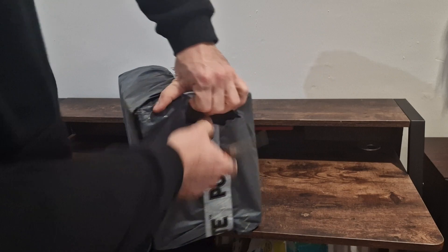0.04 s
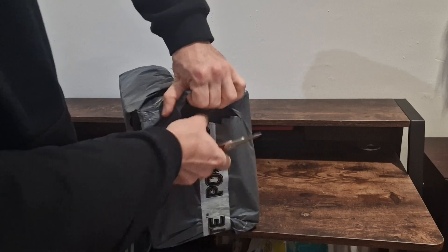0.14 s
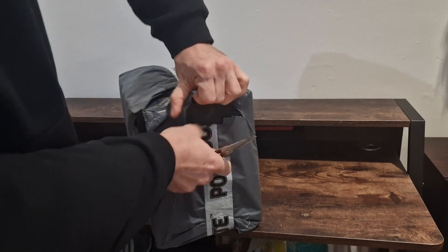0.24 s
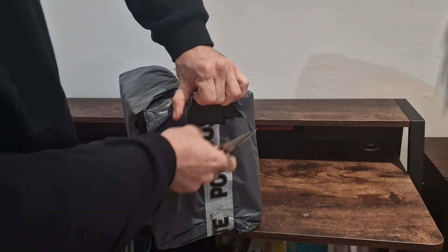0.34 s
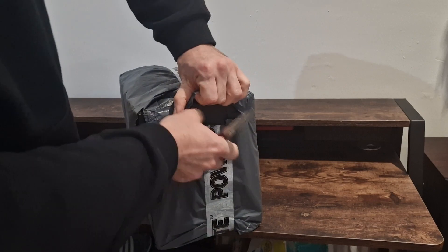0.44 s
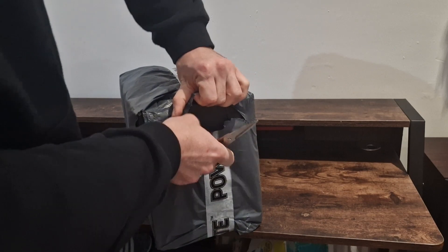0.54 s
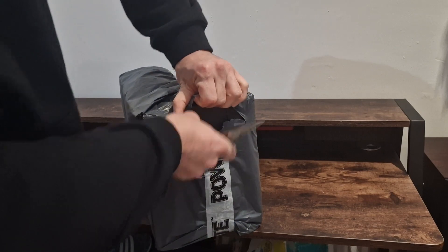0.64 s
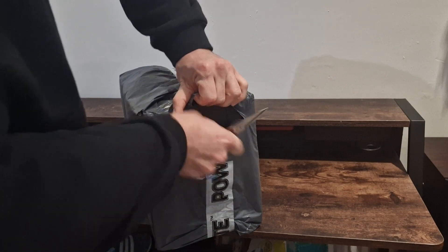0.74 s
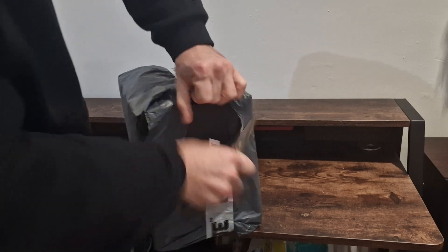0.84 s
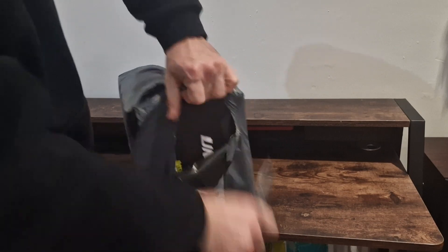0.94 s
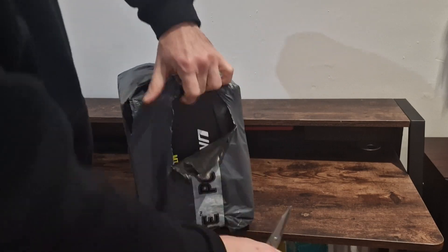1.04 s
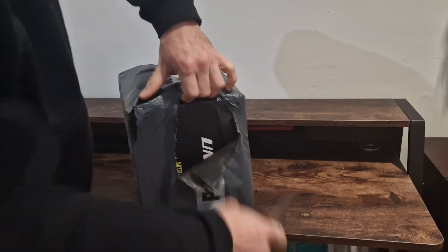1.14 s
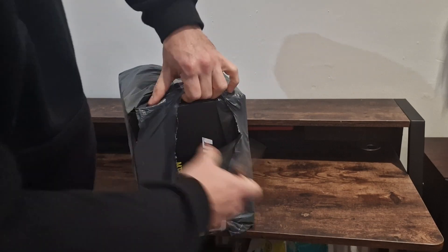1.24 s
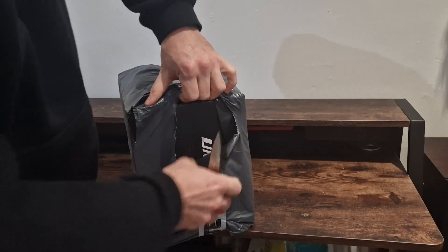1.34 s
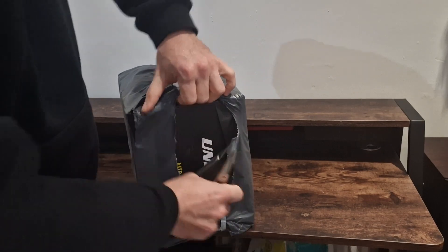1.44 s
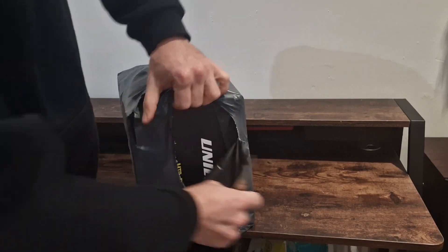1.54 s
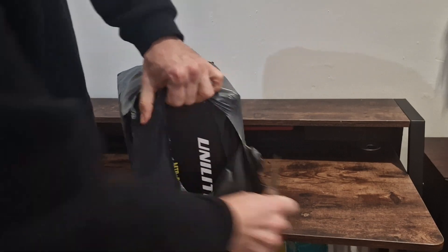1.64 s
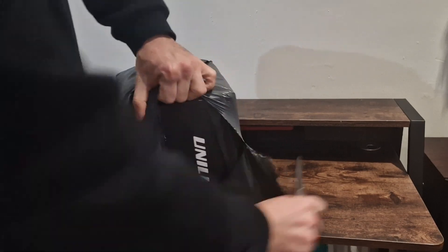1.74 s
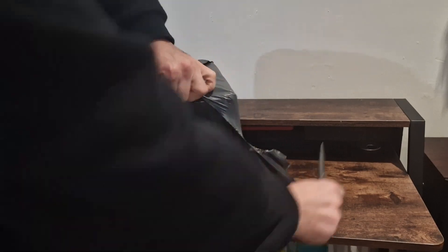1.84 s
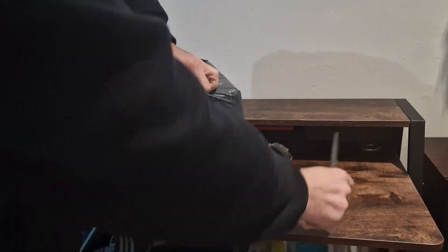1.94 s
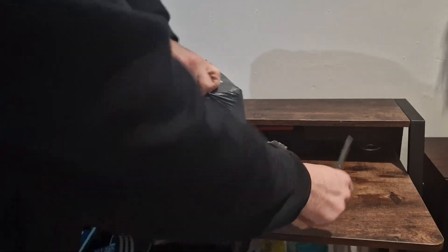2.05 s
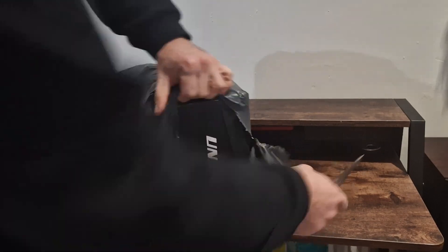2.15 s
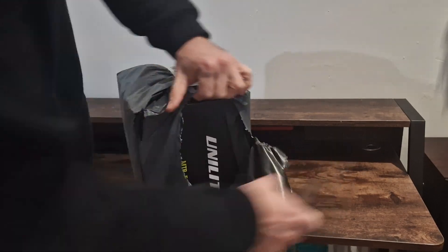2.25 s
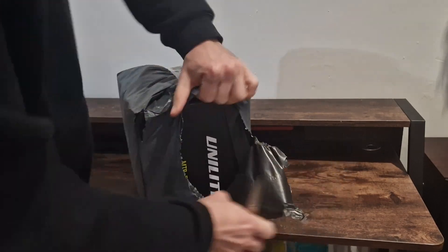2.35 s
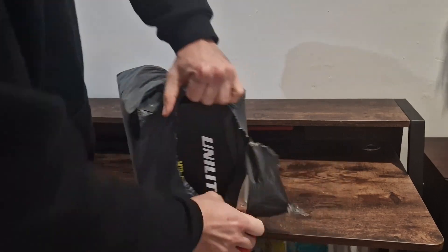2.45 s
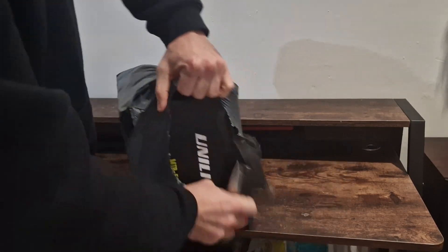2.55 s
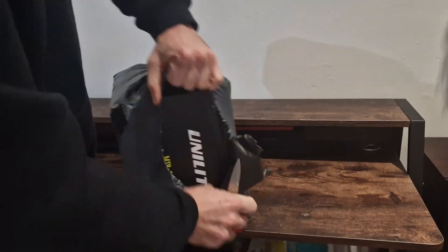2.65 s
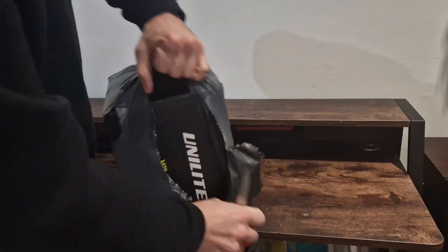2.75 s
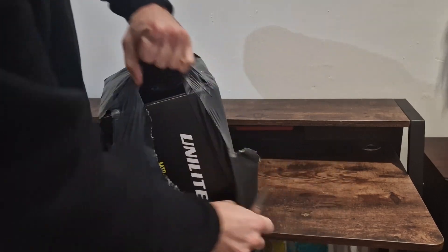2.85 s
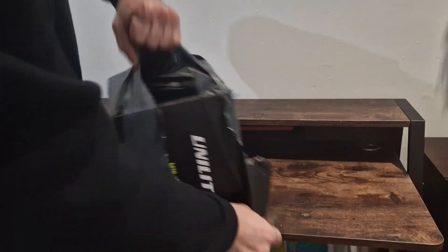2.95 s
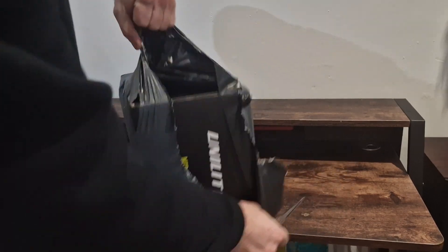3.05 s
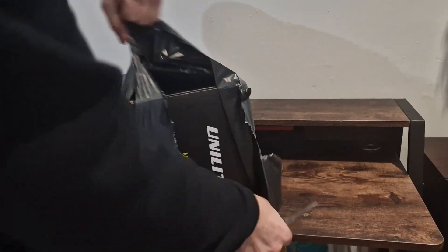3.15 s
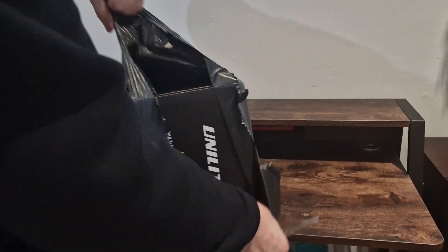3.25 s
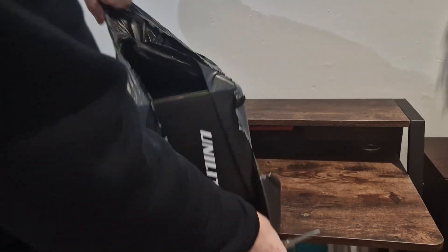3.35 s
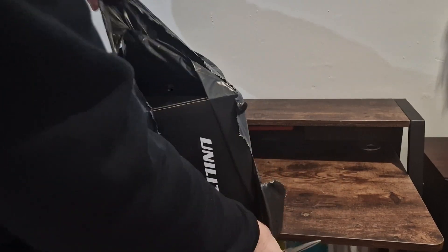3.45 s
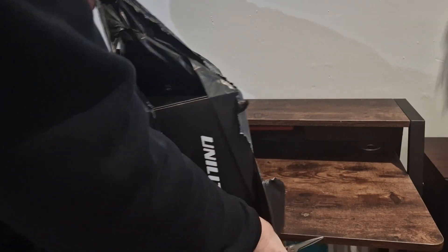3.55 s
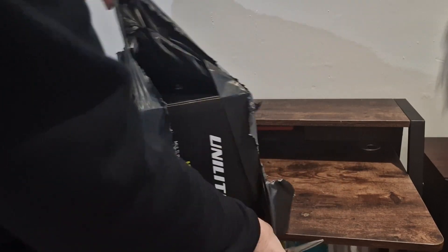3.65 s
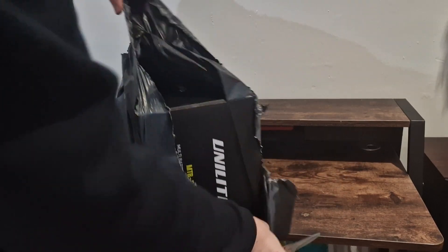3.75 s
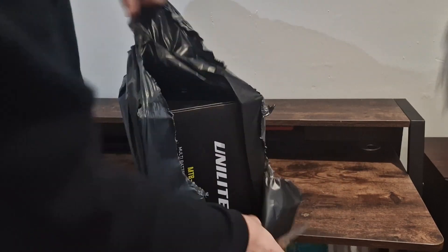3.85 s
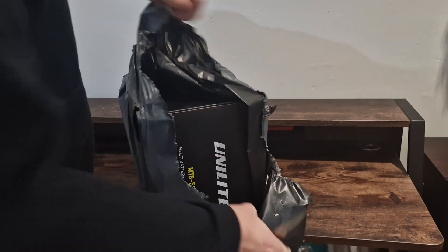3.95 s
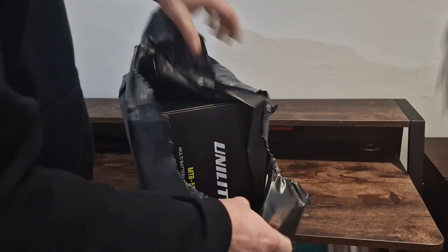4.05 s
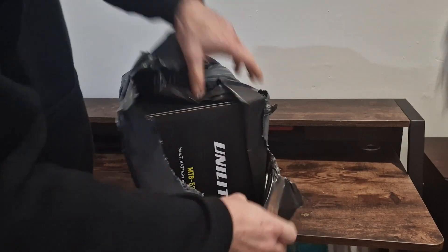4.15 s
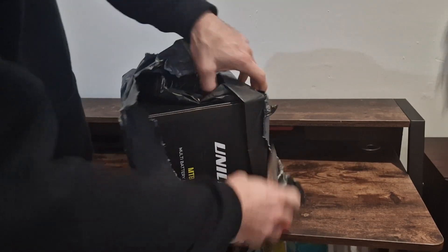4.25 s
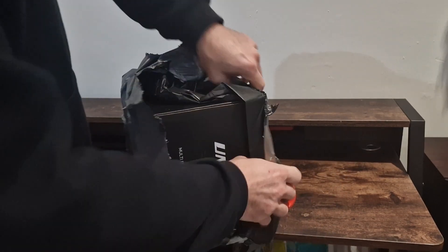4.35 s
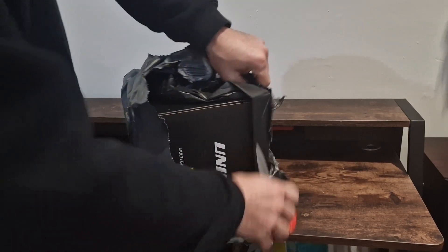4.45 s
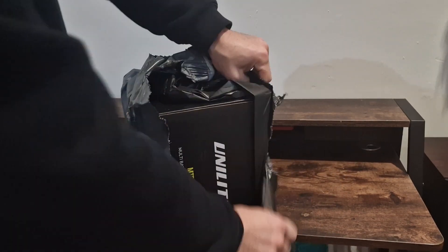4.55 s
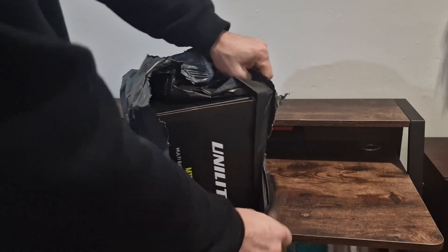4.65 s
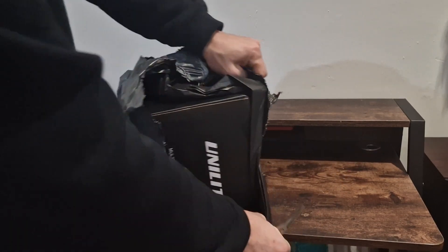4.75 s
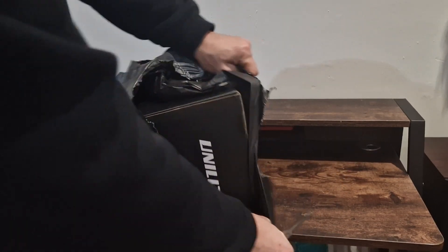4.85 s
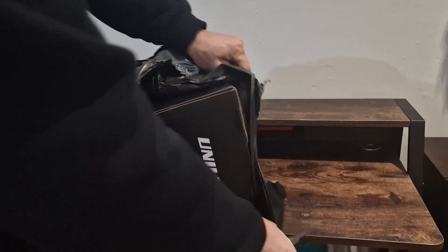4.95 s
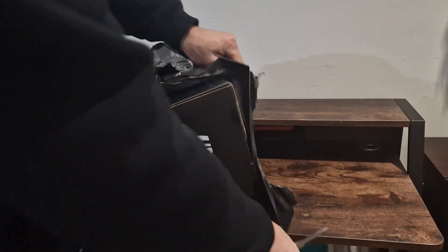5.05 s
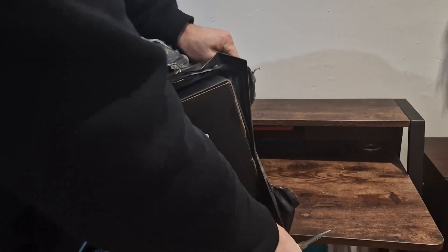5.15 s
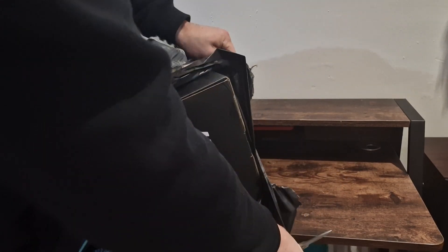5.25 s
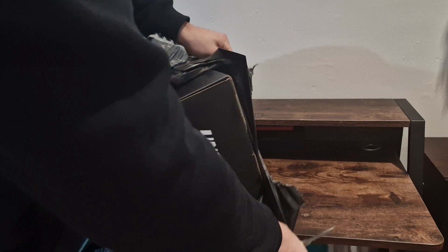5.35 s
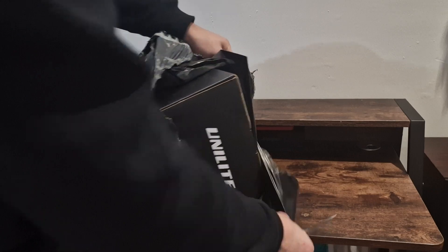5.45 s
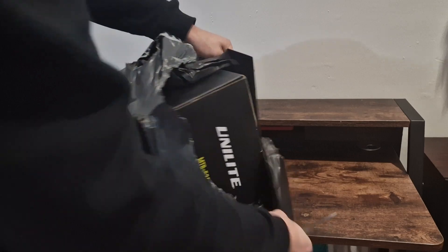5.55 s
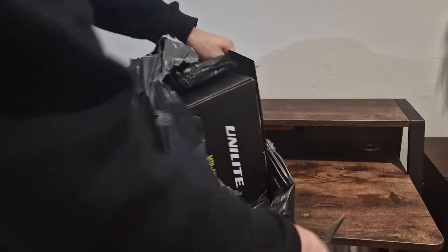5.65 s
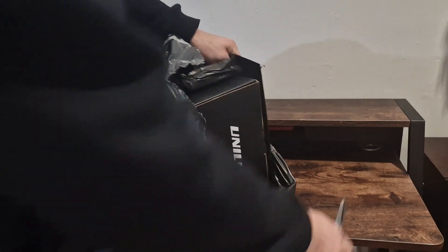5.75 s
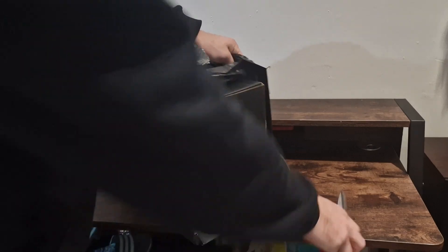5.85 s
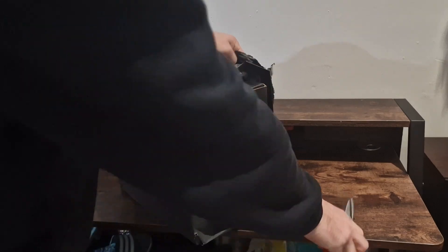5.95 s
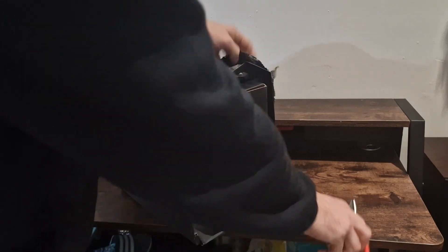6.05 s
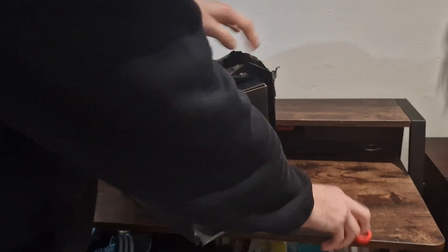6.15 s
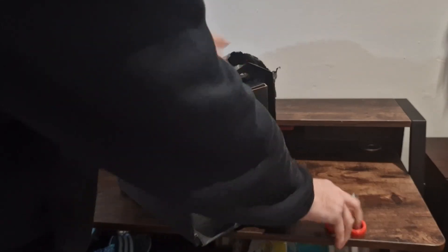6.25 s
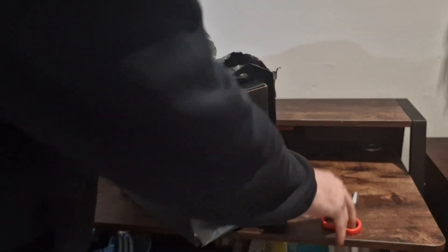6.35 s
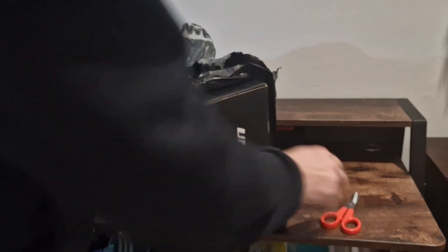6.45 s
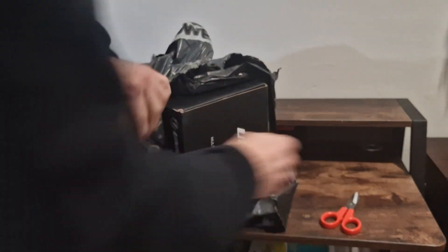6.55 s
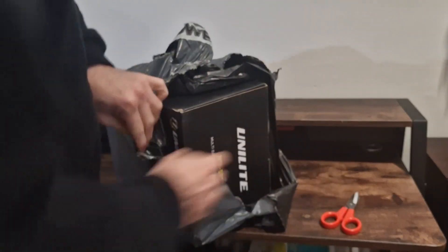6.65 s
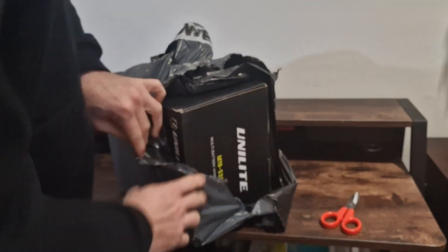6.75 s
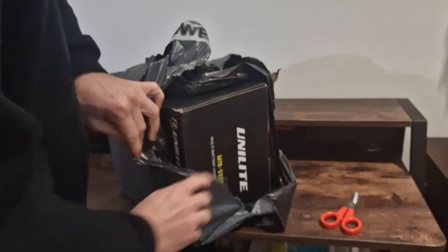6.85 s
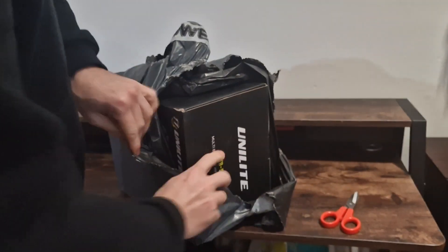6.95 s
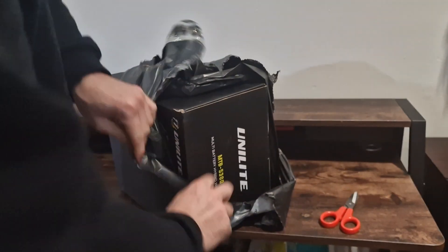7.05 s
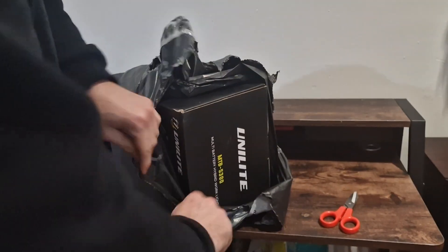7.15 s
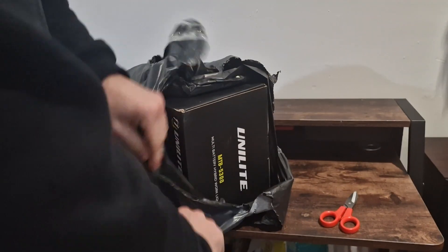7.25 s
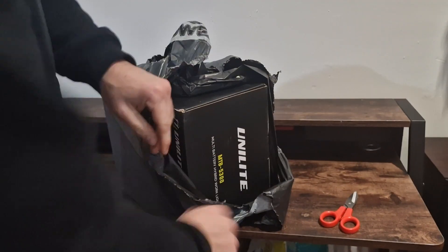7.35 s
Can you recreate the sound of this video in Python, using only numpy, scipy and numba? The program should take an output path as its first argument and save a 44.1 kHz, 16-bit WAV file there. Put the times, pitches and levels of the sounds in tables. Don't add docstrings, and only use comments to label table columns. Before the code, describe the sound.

A thin plastic bag is torn and stripped from a cardboard box in a small room. Light crinkles lead to sharp rips, then fuller waves of crackling with hollow knocks and low rumbles. The box briefly squeaks and scrapes on the desk. Near the end scissors thud softly, drop with a metallic rattle, and quieter rustling follows. Close stereo pickup with little bass and soft room noise.

```python
import sys
import numpy as np
from scipy import signal
from scipy.fft import rfft, irfft, next_fast_len
from scipy.io import wavfile
from scipy.ndimage import uniform_filter1d, map_coordinates
from numba import njit

SR = 44100
rng = np.random.default_rng(int(sys.argv[2]) if len(sys.argv) > 2 else 0)


def wav_record(signal):
    frames = np.transpose(np.atleast_2d(signal))
    bounded = np.clip(frames, -1, 1)
    quanta = np.round(bounded * 32767).astype(np.int16)
    wavfile.write(sys.argv[1], SR, quanta)


def linear_from_db(decibels):
    return 10 ** (np.asarray(decibels, float) / 20)


N = 325899

# frequency in Hz, gain in dB.
THIN_THINGS = [(80, -60), (350, 0)]


def unit(x):
    return x / np.sqrt(np.mean(x ** 2) + 1e-20)


def along(points, hz):
    f, v = np.transpose(points)
    return np.interp(np.log(hz + 1), np.log(f + 1), v)


def curves(rows):
    s, *cols = np.transpose(rows)
    return [np.interp(np.arange(N) / SR, s, c) for c in cols]


def wobble(rate):
    knots = rng.standard_normal(int(N * rate / SR) + 4)
    return map_coordinates(knots, [np.arange(N) * rate / SR])


def coloured(x, spectrum):
    m = next_fast_len(N + 8192)
    gain = linear_from_db(along(spectrum, np.fft.rfftfreq(m, 1 / SR)))
    return irfft(rfft(x, m) * gain, m)[..., :N]


def cut(x, hz, kind, order):
    return signal.sosfilt(signal.butter(N=order, Wn=hz, btype=kind, fs=SR, output="sos"), x)


def thirds(body, middle, fizz):
    edges_hz = (1500, 8700)
    return cut(body, edges_hz[0], "low", 3), cut(middle, edges_hz, "band", 3), cut(fizz, edges_hz[1], "high", 3)


def add(track, s, sound):
    at = int(round(s * SR))
    track[..., at:at + sound.shape[-1]] += sound[..., :track.shape[-1] - at]


def ring(modes, t, attack):
    tone = 0
    for hz, db, t60 in modes:
        for spread, weaker_db in ((.005, 1), (.04, 6)):
            pitch = hz * rng.normal(1, spread)
            level_db = db - weaker_db + rng.normal(0, 3.7)
            tone = tone + linear_from_db(level_db - 60 * t / t60) * np.sin(2 * np.pi * pitch * t)
    return tone * (1 - np.exp(-t / attack))


def ports(x, lag):
    m = next_fast_len(N + 64)
    turn = np.exp(-1j * np.pi * np.fft.rfftfreq(m) * lag * np.array([[1], [-1]]))
    return irfft(rfft(x, m) * turn, m)[:, :N]


def played(rows):
    s = np.arange(N) / SR
    return (s > rows[0][0]) * (s < rows[-1][0]) * linear_from_db(curves(rows)[0])


def effort(layer):
    # time of most force in
    # seconds, crinkle level in dB, swell in seconds, fade in seconds, grip in dB (how much of the box it
    pulls = [(0.06, -54.5, 0.12, 0.13, -11), (.14, -53, 0.12, 0.061, 3), (.218, -53, 0.055, .05, -23),
             (0.279, -48.5, 0.056, 0.095, 6), (0.375, -56.5, .04, 0.08, -22),
             (.425, -57.5, 0.075, 0.042, -37), (0.539, -55, 0.095, 0.13, -3),
             (.615, -56.5, 0.027, 0.17, -5), (0.765, -50, 0.034, 0.065, -31),
             (.815, -46.5, 0.05, .06, -18), (0.902, -37.5, 0.11, 0.12, -10.5),
             (1.126, -53, 0.12, 0.22, -5.5), (1.353, -53.5, 0.0095, 0.89, -18),
             (1.492, -53, 0.11, 0.12, -13), (1.6, -59, .04, .1, -14), (1.686, -44, 0.23, 0.24, -13),
             (1.785, -39.5, 0.018, 0.043, -14), (1.976, -59.5, 0.47, 0.064, -15),
             (2.2, -54.5, 0.24, 0.24, -16), (2.354, -56.5, 0.049, 0.27, -11),
             (2.5, -40.5, 0.086, 0.13, -13), (2.58, -46, 0.045, 0.084, -13),
             (2.678, -43.5, 0.087, 0.12, -15), (2.75, -45, 0.094, 0.23, -8.5),
             (2.857, -45, 0.14, 0.14, -15), (2.96, -41, 0.063, 0.08, -9), (3.02, -43.5, 0.068, 0.12, 0),
             (3.237, -41.5, 0.17, 0.2, -7.5), (3.32, -41.5, 0.058, 0.095, -9),
             (3.41, -37, 0.088, .11, -14), (3.49, -47, 0.13, 0.087, -13),
             (3.67, -61.5, 0.13, 0.12, 14), (3.8, -49, 0.26, 0.51, -11), (3.903, -52, 0.024, 0.1, -13),
                 (4.188, -48, 0.14, 0.12, -6), (4.282, -48, 0.078, 1, -17.5),
                 (4.564, -47.5, 0.075, 0.13, 4), (4.947, -43.5, 0.54, 0.35, -18),
                 (5.1, -45, 0.14, 0.069, -11), (5.262, -49.5, 0.42, 0.54, -10),
                 (5.55, -42.5, 0.26, 0.31, -23), (5.592, -40, 0.011, 0.061, 6),
                 (5.853, -52.5, 0.052, 0.41, -7), (6.045, -50, 0.065, 0.048, -22),
                 (6.503, -57, 0.79, 0.44, -10), (6.742, -51, 0.15, 0.19, -15),
                 (6.913, -50.5, 0.061, 0.17, -6.5), (7.129, -44.5, 0.15, 0.16, -21.5),
                 (7.245, -51, 0.031, 0.076, -19.5)]
    layers = {"body": (-0.89, 0.33, 1), "middle": (2.78, 0.0078, 1.22), "fizz": (-3, 0.028, 1.34),
              "rumble": (-5, 0.38, 0.82)}
    stroke_db, roundness = 20, 1.5
    over_db, share, steep = layers[layer]
    t = np.arange(0, N, 64) / SR
    s, db, swell, fade, grip_db = np.transpose(pulls)[:, :, None]
    away = np.where(t < s, (s - t) / np.maximum(swell, .01), (t - s) / np.maximum(fade, .01))
    level_db = db + over_db + share * grip_db - steep * stroke_db * away ** roundness
    power = linear_from_db(2 * level_db).sum(axis=0)
    return np.interp(np.arange(N) / SR, t, np.sqrt(power))


@njit
def sprinkle(n, start, lag, step, fade, size):
    out = np.zeros((2, n + 512))
    for g in range(len(start)):
        for i in range(min(400, int(6 / fade[g]))):
            v = size[g] * np.exp(-fade[g] * i) * np.sin(step[g] * (i + 1))
            out[0, start[g] + lag[g] + i] += v
            out[1, start[g] + i] += v
    return out[:, :n]


def crinkle(count, spread_db, cycles, lag, lag_spread):
    draw = rng.random((count, 4))
    busy = np.cumsum(linear_from_db(3 * wobble(20) + 2.5 * wobble(90)))
    start = np.searchsorted(busy, draw[:, 0] * busy[-1]) + 16
    step = 2 * np.pi * 400 * 40 ** draw[:, 1] ** .7 / SR
    size_db = np.minimum(-spread_db * np.log(1 - draw[:, 2]), 17)
    gap = np.round(lag + lag_spread * (2 * draw[:, 3] - 1))
    gap = np.clip(gap, -16, 16).astype(np.int64)
    return sprinkle(N, start, gap, step, step / (np.pi * cycles), linear_from_db(size_db) * step)


def bag():
    # frequency in Hz, level in dB per Hz.
    film = [(180, -38), (300, -5.5), (406, 0), (531, -2), (754, -1.5), (892, -3.5), (1310, -3), (1720, -3),
            (2700, 0), (7500, -6.5), (9810, -19.5), (15200, -20), (16500, -19)]
    # time in seconds, level in dB, tightness from 0 to 1 (how high it sounds).
    pouch = [(0.3, -16, 0), (0.7, -16.5, 0.3), (0.9, -18, .4), (1.7, -14, 0.3), (2.05, -8, 0.7),
             (2.25, -18.5, 0.6), (2.62, -9, 0.4), (2.9, -14.5, 0.2), (3.1, -16, .6), (3.6, -9, 0.1),
             (4.2, -18.5, 0.5), (4.5, -12.5, 0.5), (4.9, -10.5, 0), (5.27, -9.5, 0.03), (5.85, -9, 0.1),
             (6.3, -8, 0.7), (6.7, -19, 0.3), (7.2, -23.5, 0.1)]
    slack_hz, tight_hz = (1100, 2150), (1800, 2450)
    dulling = 0.6
    clicks = unit(crinkle(count=70000, spread_db=4.3, cycles=2.5, lag=-3, lag_spread=8))
    rub = unit(rng.standard_normal((2, N)) + 0.5 * rng.standard_normal(N))
    rustle = coloured(clicks + 0.78 * rub, THIN_THINGS[:1] + film)
    body, middle, fizz = thirds(rustle, rustle, rustle)
    pouch_db, tight = curves(pouch)
    low = unit(cut(middle, slack_hz, "band", 2))
    high = unit(cut(middle, tight_hz, "band", 2))
    hollow = np.sqrt(np.clip(1 - tight, 0, 1)) * low + np.sqrt(np.clip(tight, 0, 1)) * high
    middle = (unit(middle) + linear_from_db(pouch_db) * unit(hollow)) / np.sqrt(1 + linear_from_db(2 * pouch_db))
    fizz = linear_from_db(-dulling * (pouch_db - pouch_db.mean())) * unit(fizz)
    return effort("body") * unit(body) + effort("middle") * middle + effort("fizz") * fizz


def snaps():
    # time in seconds, peak in dB, pop in Hz, pan in dB, body in dB.
    rips = [(0.242, -35, 2060, 12, -22), (0.2773, -29.5, 2090, 0, -0.5), (0.8198, -28, 2400, 7, -12),
            (0.864, -9, 1700, 3, -22), (1.5281, -22, 1860, 2, -13.5), (1.5966, -21, 4560, 0, -39),
            (1.667, -25, 1980, 7, -18), (1.7715, -19, 2330, 12, -8), (1.7819, -6.5, 1890, 2, -48),
            (2.478, -21, 3500, 3, -2.5), (2.5149, -17, 2020, 3, -7), (2.6594, -21, 3580, 3, -34),
            (2.9494, -13.5, 2570, 3, -3.5), (3.3766, -17.5, 1350, 0, -10.5), (4.2742, -32.5, 1400, 3, -4),
            (4.567, -26.5, 1830, 8, -9), (4.8995, -29.5, 1510, 3, -2.5), (5.076, -26.5, 2490, -4, -3),
            (5.246, -28, 2050, -2, -5), (5.572, -17.5, 4730, -7, -13), (5.589, -8.5, 4330, 3, -3)]
    # time in seconds, peak in dB, pop in Hz, pan in dB.
    ticks = [(0.0628, -35, 7400, 7), (0.3701, -39, 3020, 1), (0.7437, -40, 2430, -1),
             (0.7632, -43, 2080, -2), (1.0802, -41, 1190, 2), (1.1434, -34, 5100, 3),
             (1.2629, -40, 1230, 3), (1.3294, -39.5, 3000, 0), (1.3525, -48, 1530, -1),
             (1.3788, -39, 1300, 6), (1.425, -33.5, 4960, 8), (1.4682, -36, 2260, 1),
             (1.4834, -34, 3300, 5), (1.4994, -31, 5600, 2), (2.2404, -37, 2100, 4), (2.3321, -48, 2235, 6),
             (2.4478, -42, 1920, 2), (3.142, -38.5, 1460, 5), (3.5897, -48, 1321, -2),
             (3.6276, -40.5, 1500, 1), (3.7168, -36.5, 1480, 4), (4.5166, -30.5, 2060, -2),
             (5.394, -40, 1370, 0), (6.4577, -54, 1630, -1), (6.4733, -37.5, 1490, 4),
             (6.541, -37, 7400, -3), (6.6325, -36.5, 7680, 5), (6.7211, -26, 7840, 1),
             (7.098, -32, 2250, 0)]
    sparks = [(0.0368, -42, 2900, 3), (0.4673, -52, 2790, 6), (0.596, -47, 5000, 2), (0.6085, -38, 4600, 3),
              (0.7677, -35, 7000, -1), (0.8036, -34, 7410, -1.5), (0.855, -22, 5000, 4),
              (1.037, -54, 9000, 1.5), (1.5728, -33.5, 3470, 6), (1.7823, -41, 4250, 6),
              (2.03, -59, 2310, 5), (2.066, -50, 1980, 6), (2.1839, -41, 6000, -2), (2.2165, -35, 5000, 2),
              (2.3325, -37, 8000, 4), (2.37, -47, 6000, 1.5), (2.5511, -29, 4390, 1.5),
              (2.6229, -34, 3290, 4), (2.681, -34, 3500, 5), (2.748, -45, 8000, 1.5),
              (2.8499, -34, 6000, 4), (2.86, -35, 8000, 9), (2.992, -29, 6000, 7), (3.02, -30, 2230, 5),
              (3.3064, -36, 2740, 1.5), (3.417, -32, 1240, -4), (3.5513, -43, 2170, 1),
              (3.6087, -44, 2040, 0), (3.674, -44, 1290, 8), (3.693, -50, 2280, 0.6), (3.925, -34, 1240, 2),
              (4.0771, -51, 2190, 3), (4.0881, -46, 2000, 4), (4.286, -45, 2900, 1.5),
              (4.357, -37, 2250, 0), (4.6493, -39, 2120, 4), (4.6793, -33.5, 6290, 3),
              (5.2804, -41, 2400, 0.3), (5.4819, -40, 3280, 9), (5.9668, -40, 3940, 1.5),
              (0.428, -43, 3320, 9)]
    rip_t60, tick_t60 = 0.052, 0.078
    tick_db, tick_body_db, spark_fizz_db = 5.5, -15, 1.5
    events = [(*rip, rip_t60, 0) for rip in rips]
    for rows, extra_db in ((ticks, 0), (sparks, spark_fizz_db)):
        for s, db, pop_hz, pan, in rows:
            events.append((s, db + tick_db, pop_hz, pan, tick_body_db, tick_t60, extra_db))

    parts, t = np.zeros((3, 2, N + SR)), np.arange(SR // 12) / SR
    for s, db, pop_hz, pan, body_db, t60, extra_db in events:
        fizz_db = extra_db - 17.5 - 3.5 * np.log2(pop_hz / 2000)
        pop = 0.98 * np.sin(2 * np.pi * pop_hz * t)
        pop = pop + 0.5 * np.sin(2 * 2 * np.pi * min(pop_hz, 5000) * t)
        pop = pop * np.exp(-t * pop_hz / 2.3)
        spatter = rng.standard_normal((2, len(t))) * linear_from_db(-60 * t / t60)
        spatter = spatter * (0.39 + 0.41 * np.exp(-t / 0.0055))
        keep = np.exp(-2 * np.pi * min(1.25 * pop_hz, 9000) / SR)
        dull = signal.lfilter([np.sqrt(1 - keep ** 2)], [1, -keep], spatter)
        dull = signal.lfilter(*signal.butter(N=2, Wn=pop_hz / 1.44, btype="high", fs=SR), dull)
        burst = np.array([pop, np.roll(pop, 3)]) + dull
        gains = linear_from_db([db + body_db + 13.0, db, db + fizz_db + 3.5])[:, None, None]
        add(parts, s, gains * [burst, burst, spatter] * linear_from_db([[pan / 2], [-pan / 2]]))
    return linear_from_db(-7.0) * coloured(sum(thirds(*parts[..., :N])), THIN_THINGS)


def box_blows():
    # frequency in Hz, level in dB.
    wall_modes = [(85, -28.5), (152, 3.5), (265, 5), (330, 6), (490, 7.5), (720, 9), (1150, 5.5),
                  (1400, -13)]
    # time in seconds, peak in dB, main ring in Hz, hardness in dB.
    knocks = [(0.13, -34, 304, -2.5), (0.177, -40, 263, -20), (0.241, -39, 272, -1),
              (0.276, -28.5, 480, -1.5), (0.768, -44, 278, -6), (0.862, -24, 276, -9),
              (1.466, -38, 265, -19), (1.651, -29.5, 252, -11), (1.7809, -27, 433, -2),
              (1.787, -18, 237, -20), (2.088, -51.5, 324, 7), (2.212, -51.5, 580, 11),
              (2.486, -22, 276, -14), (2.674, -34, 395, -13), (2.85, -36, 603, -14), (2.9, -39, 273, -2),
              (2.948, -19, 291, -2.5), (2.955, -25, 334, -19.5), (2.992, -30, 594, -8),
              (3.309, -31, 362, -1.5), (3.414, -48.5, 386, 20), (3.565, -46, 335, -13),
              (3.626, -45.5, 350, 1.5), (3.668, -42.5, 463, 2), (3.692, -39, 392, -8),
              (3.723, -40.5, 416, 0), (3.766, -46, 396, -16), (3.859, -40, 258, -14),
              (3.896, -37, 717, 0.5), (3.903, -36, 263, -14), (3.942, -45, 380, -4), (4.215, -36, 290, -7),
              (4.243, -30, 447, -9), (4.266, -23, 434, -11), (4.2754, -21.5, 480, -12),
              (4.366, -38.5, 600, 2), (4.341, -30.5, 417, -7), (5.071, -38, 447, 1.5),
              (5.57, -30.5, 354, -3), (5.588, -16, 337, -8), (6.564, -30, 294, -8.5)]
    bumps = [(0.147, -29, 94, -17), (0.31, -35, 148, -4), (0.476, -38, 157, -4), (0.555, -41, 149, -21),
             (0.948, -25, 73, -32), (1.088, -36, 159, -13), (1.115, -34.5, 156, -1.5),
             (1.17, -36.5, 74.5, -27), (1.811, -28.5, 90, -29), (2.501, -31, 80.4, -29),
             (3.92, -39.5, 65, -32), (6.421, -43.5, 94, -25), (6.93, -35, 70, -31), (7.2, -41.5, 75, -26),
             (2.567, -29.5, 172, -25), (3.085, -17.5, 187, -20), (3.375, -29, 136, -2),
             (4.2, -31.5, 73, -24), (4.229, -26.5, 113, -12), (6.311, -21, 74, -12),
             (6.685, -32, 129, -2.5), (6.709, -35, 123, -43), (6.881, -41.5, 118, -1),
             (7.157, -36.5, 137, -10)]
    knock_t60, bump_t60 = 0.068, 0.092
    out, t = np.zeros(N + SR), np.arange(SR // 7) / SR
    blows = [(*row, knock_t60) for row in knocks] + [(*row, bump_t60) for row in bumps]
    for s, db, main_hz, hard_db, t60 in blows:
        modes = [(main_hz, 0, t60)]
        for hz, level in wall_modes:
            modes.append((hz * rng.normal(1, 0.054), level - 7.5 + hard_db * hz / 900, t60 * (200 / hz) ** 0.3))
        slap = signal.lfilter([.25], [1, -.88], rng.standard_normal(len(t)))
        slap = slap * linear_from_db(hard_db - 60 * t / 0.079)
        add(out, s, linear_from_db(db - 8.5) * (ring(modes, t, attack=0.0016) + 1.93 * slap))
    return out[:N]


def box_rumble():
    # frequency in Hz, level in dB per Hz.
    hollow_colour = [(25, -27), (60, -12.5), (110, -4.5), (152, 2.5), (200, -1.5), (290, 2.5), (400, -2.5),
                     (600, -18), (1200, -16), (4000, -87)]
    lumps = linear_from_db(2.4 * wobble(30))
    return effort("rumble") * unit(lumps * coloured(rng.standard_normal(N), hollow_colour))


def box_creak():
    # time in seconds, level in dB.
    drags = [
        [(3.88, -74), (3.894, -51.5), (4.068, -54), (4.12, -60)],
        [(4.25, -56), (4.28, -39), (4.33, -50), (4.37, -49)],
    ]
    squeak_hz, sag_hz_per_s, jitter = 774, 305, 0.0605
    t = np.arange(SR // 7) / SR
    slips = rng.standard_normal(N) * linear_from_db(2.5 * wobble(70))
    edge = ring([(747, -3, 0.032), (1400, -1.5, 0.015)], t, attack=0.00074)
    creak = unit(signal.fftconvolve(slips, edge)[:N])
    first, last = drags[0][0][0], drags[0][-1][0]
    since = np.clip(np.arange(N) / SR - first, 0, last - first)
    pitch = (squeak_hz - sag_hz_per_s * since) * (1 + jitter * unit(uniform_filter1d(slips, size=300)))
    squeak = 0.95 * np.sin(2 * np.pi * np.cumsum(pitch) / SR)
    return played(drags[0]) * (0.69 * creak + squeak) + played(drags[1]) * creak


def scissors():
    # time in seconds, peak in dB, blade share in dB,
    # hardness in dB, chatter in dB.
    taps = [
        (5.963, -8.5, -38, -29, -36),
        (5.98, -5.5, -42, -43, -54),
        (5.997, -9.5, -40, -42.5, -49),
        (6.2, -7.5, 0.5, -2.5, -16),
        (6.221, -14.5, -7, -3.5, -25),
        (6.244, -17.5, -13, 0, 0.5),
        (6.258, -16.5, -10, -2, 2),
        (6.264, -12, -0.5, -22, 3),
        (6.284, -9.5, -14, -12, -14),
        (6.305, -17, -13, -1, 0.5),
    ]
    # frequency in Hz, level in dB, time to fall 60 dB in seconds.
    desk = [(141, -9, 0.041), (325, -15, 0.066), (463, -2.5, 0.067), (590, -8.5, 0.051), (831, -16, 0.09),
            (1112, 0.5, 0.069), (1390, 7.5, 0.022), (1700, 4, 0.016), (2250, 3, 0.045), (2470, 10, 0.019),
            (2790, 6.5, 0.024), (2980, 1, 0.012)]
    blades = [(3700, -4, .02), (4280, 0, .03), (5330, -4, .015), (6210, -1, .025), (7490, -5, .02),
              (8060, -6, .015), (9900, -8, .015)]
    # frequency in Hz, level in dB per Hz.
    steel = [(180, -43), (300, -4.5), (717, -6), (1090, -8.5), (1270, -7), (2440, -8), (4240, -12.5),
             (6240, -12.5), (15400, -31), (16500, -45)]
    chatter_t60 = 0.14
    out, shake, t = np.zeros(N + SR), np.zeros(N + SR), np.arange(SR // 5) / SR
    for s, db, blade_db, hard_db, chatter_db in taps:
        wood = [(hz, level + hard_db * hz / 1800, life) for hz, level, life in desk]
        knock = ring(wood, t, attack=0.004)
        clink = linear_from_db(blade_db - 2.5) * ring(blades, t, attack=0.00086)
        add(out, s + 0.001014, linear_from_db(db - 8.5) * (knock + clink))
        chatter_power = linear_from_db(2 * (db + chatter_db - 5.5 - 60 * t / chatter_t60))
        add(shake, s, chatter_power * (1 - np.exp(-t / 0.0015)))
    hits = linear_from_db(2.5 * wobble(500)) * (rng.standard_normal((2, N)) + .7 * rng.standard_normal(N))
    chatter = np.sqrt(shake[:N]) * unit(coloured(hits, THIN_THINGS[:1] + steel))
    return ports(out[:N], lag=3.56) + chatter


def pings():
    # time in seconds, peak in dB, frequency in Hz, time to fall 60 dB in seconds.
    contacts = [(0.8203, -20.5, 5500, 0.0032), (0.98, -33, 3500, 0.0045), (0.92, -30, 5000, .004),
                (0.901, -36, 4000, 0.0036), (1.5972, -32, 4500, .005), (1.794, -11.5, 4150, 0.0097),
                (2.09, -41.5, 1600, 0.028), (2.089, -43, 500, 0.023), (2.3, -44, 1000, .04),
                (2.2127, -35, 560, 0.017), (2.949, -19, 290, 0.067), (4.272, -33.5, 1110, 0.068),
                (4.274, -42, 2420, 0.06), (4.272, -30, 730, 0.071), (5.965, -25, 463, 0.16),
                (5.964, -33, 830, 0.054), (5.964, -40.5, 1750, 0.032), (5.997, -33.5, 150, .08),
                (6.186, -47.5, 4200, 0.08), (6.201, -23.5, 4274, 0.044), (6.201, -29, 2256, 0.068),
                (6.201, -25, 2740, 0.087), (6.2665, -13, 6200, .04), (6.306, -23, 6200, 0.065),
                (5.394, -32, 1350, 0.023), (3.8, -33.5, 1430, .015), (7.5, -25, 5000, .008),
                (4.9, -36, 2100, 0.058), (0.0628, -42, 7000, .004)]
    out, t = np.zeros(N + SR), np.arange(SR // 5) / SR
    for s, db, hz, t60 in contacts:
        add(out, s, linear_from_db(db - 60 * t / max(t60, .001)) * np.sin(2 * np.pi * hz * t))
    return out[:N]


def room(x, count):
    # frequency in Hz, time to fall 60 dB in seconds.
    decay = [(100, 0.27), (1000, 0.19), (5000, 0.25), (14000, 0.22)]
    hz, t, z = signal.stft(rng.standard_normal((count, 2, SR // 3)), SR, nperseg=256)
    alike = 0.92 / (1 + (hz[:, None] / 1000) ** 2)
    z = np.sqrt(alike) * z[:, :1] + np.sqrt(1 - alike) * z
    tails = signal.istft(z * linear_from_db(-60 * t / along(decay, hz)[:, None]), SR, nperseg=256)[1]
    late = np.pad(x.mean(axis=0), (90, 0))[:N]
    late = coloured(late, [(90, -2.5), (260, 0.0), (500, -0.77)])
    spot = (np.arange(N) * 9 / SR) % count
    out = 0
    for k, tail in enumerate(tails):
        share = np.sqrt(np.clip(1 - abs((spot - k + 1) % count - 1), 0, 1))
        out = out + signal.oaconvolve((late * share)[None], tail / np.linalg.norm(tail[0]), axes=1)[:, :N]
    return out


def quiet_air():
    # frequency in Hz, level in dB per Hz.
    air_colour = [(15, -25), (25, 5), (288, -15), (706, -17), (1060, -17), (1930, -13.5), (2600, -17),
                  (6380, -14.5), (16500, -46)]
    noise = rng.standard_normal((2, N)) + 0.3 * rng.standard_normal(N)
    return linear_from_db(-67) * unit(coloured(noise, air_colour))


def scene():
    box = box_blows() + box_rumble() + box_creak()
    near = bag() + snaps() + ports(box, lag=-6.5) + scissors() + ports(pings(), lag=-2.6)
    return linear_from_db(2.5) * near + linear_from_db(-4.0) * room(near, count=4) + quiet_air()


def roll_off(x):
    return signal.sosfilt(signal.butter(12, 17000, fs=SR, output="sos"), x)


def record(dry):
    # frequency in Hz, gain in dB.
    microphone = [(20, -16), (45, -10), (80, -1.5), (15800, 1), (16100, -24), (17000, -78)]
    return roll_off(coloured(dry, microphone))


dry = scene()
out = record(dry)
wav_record(out)
```